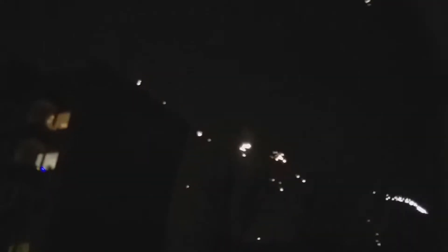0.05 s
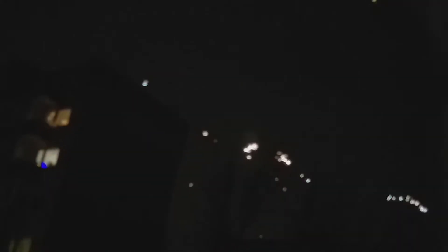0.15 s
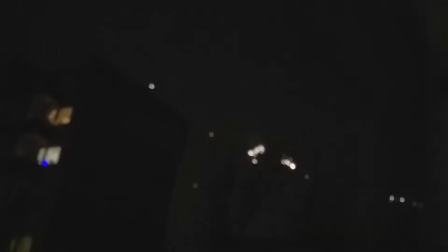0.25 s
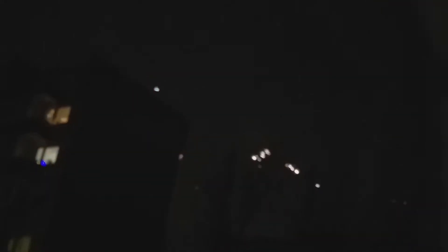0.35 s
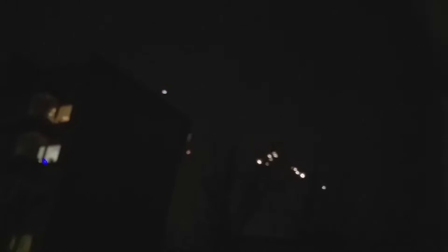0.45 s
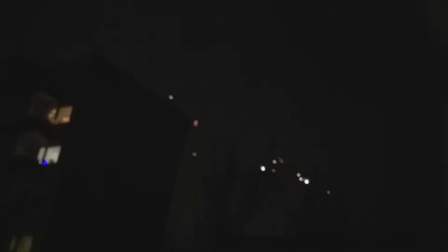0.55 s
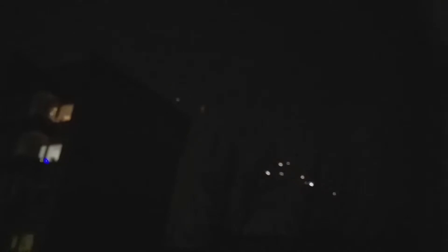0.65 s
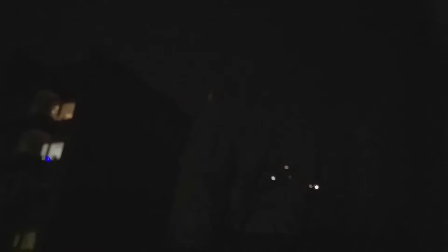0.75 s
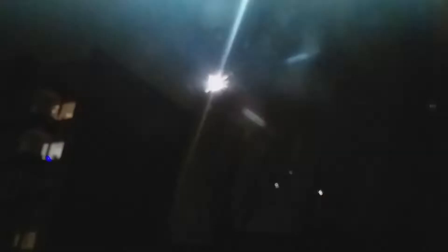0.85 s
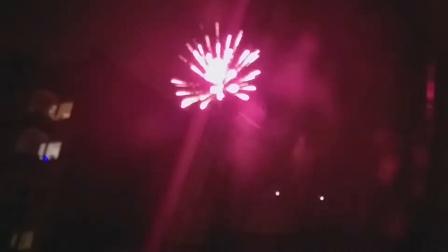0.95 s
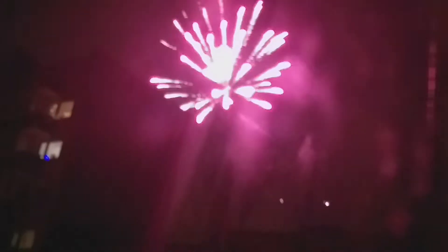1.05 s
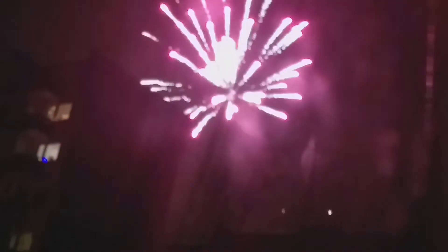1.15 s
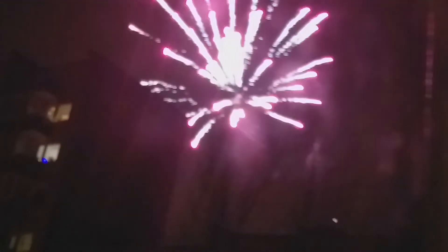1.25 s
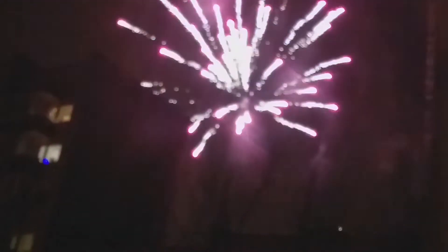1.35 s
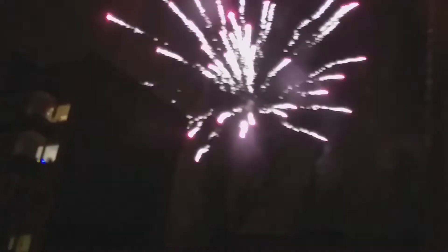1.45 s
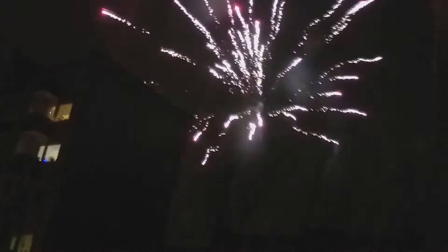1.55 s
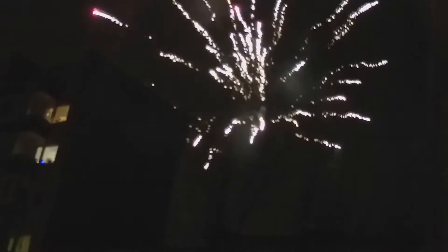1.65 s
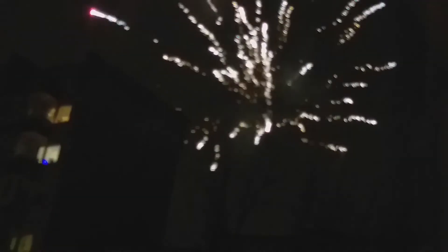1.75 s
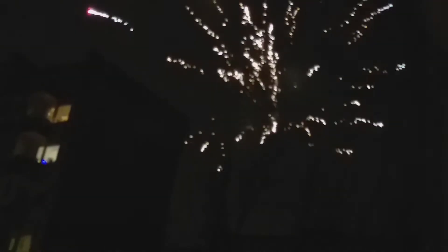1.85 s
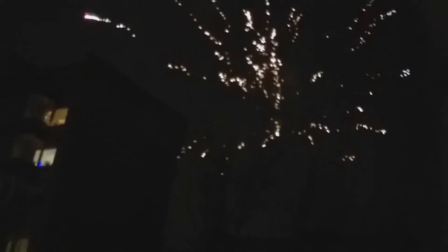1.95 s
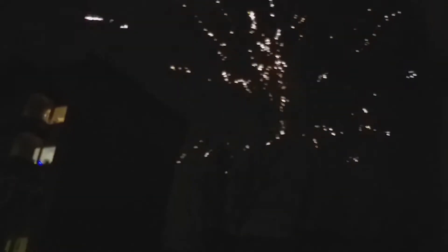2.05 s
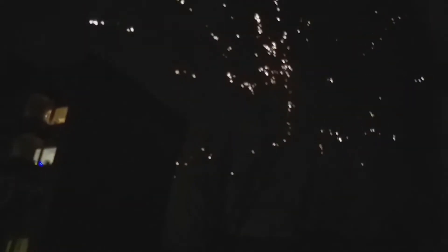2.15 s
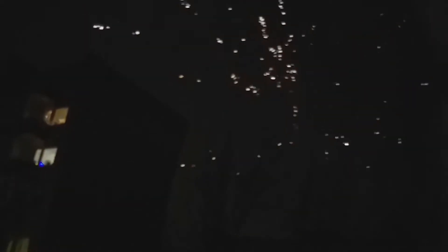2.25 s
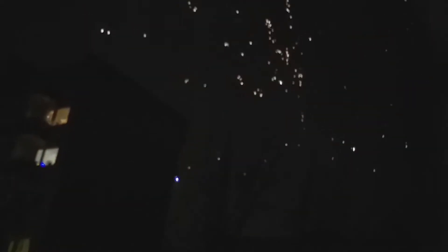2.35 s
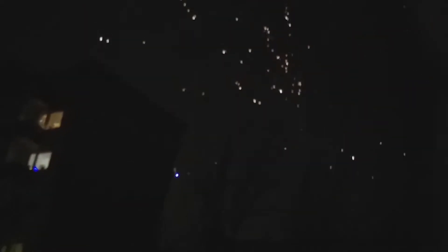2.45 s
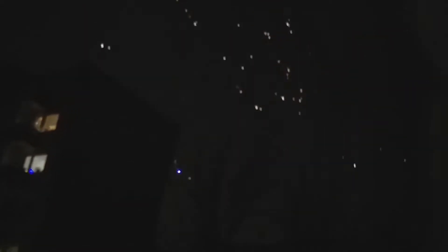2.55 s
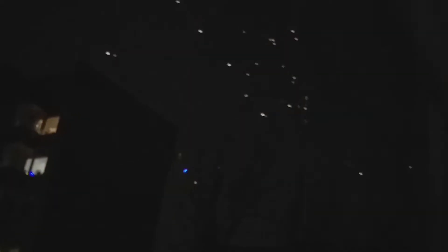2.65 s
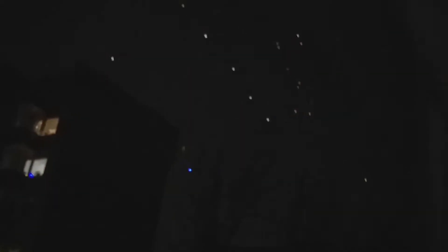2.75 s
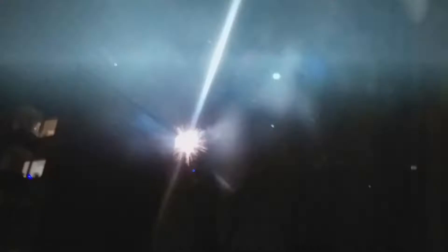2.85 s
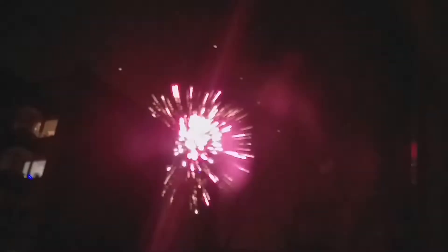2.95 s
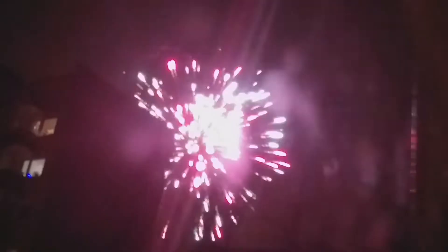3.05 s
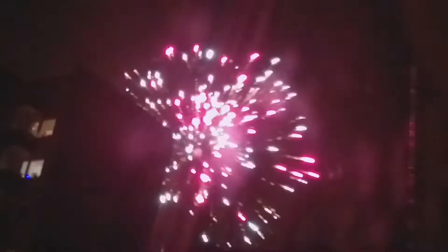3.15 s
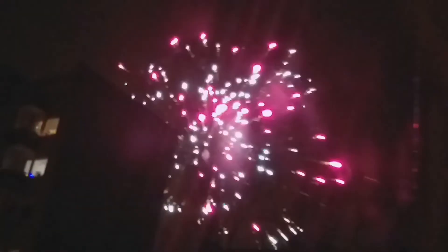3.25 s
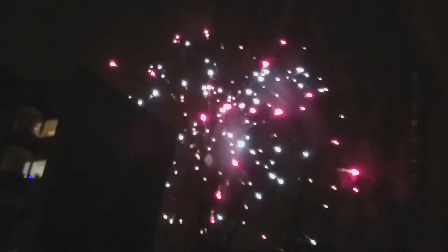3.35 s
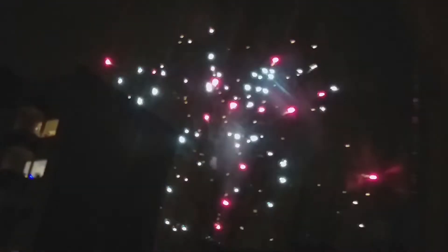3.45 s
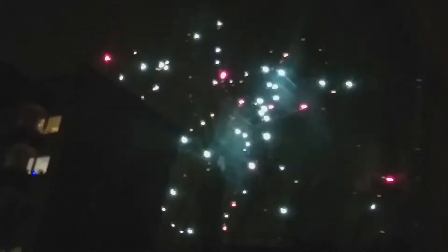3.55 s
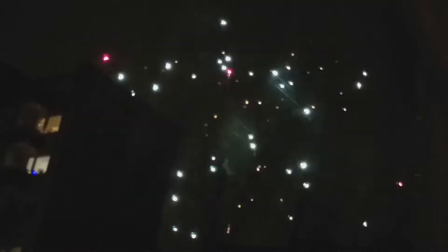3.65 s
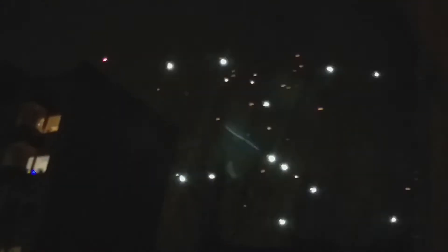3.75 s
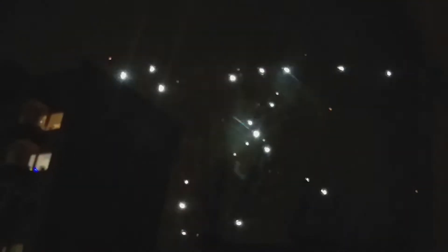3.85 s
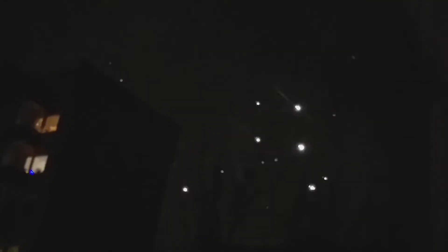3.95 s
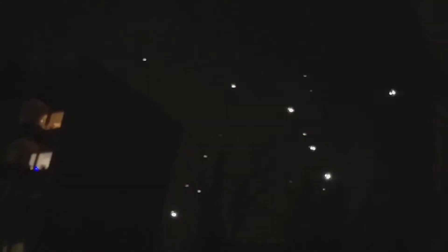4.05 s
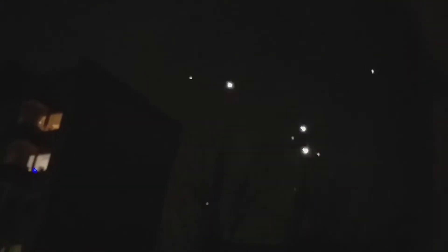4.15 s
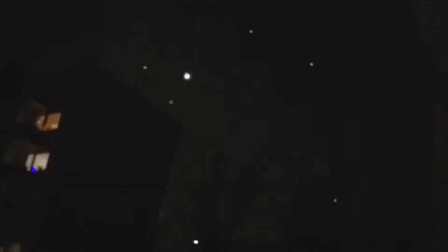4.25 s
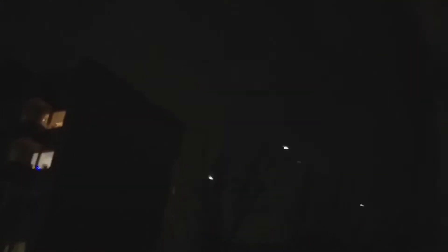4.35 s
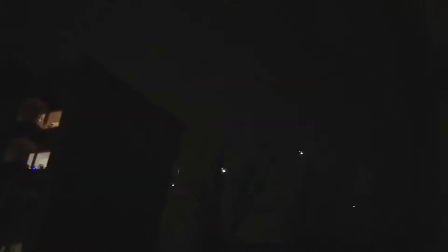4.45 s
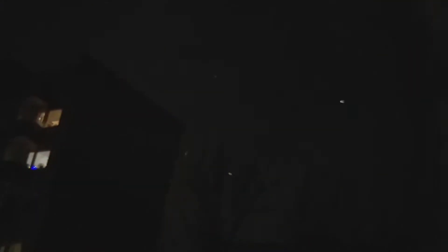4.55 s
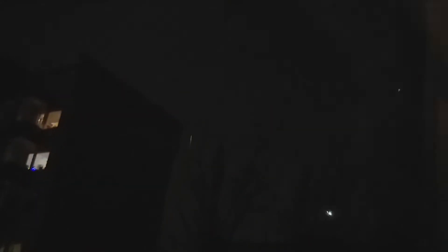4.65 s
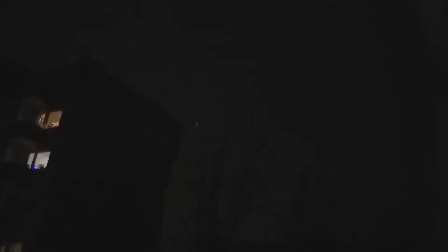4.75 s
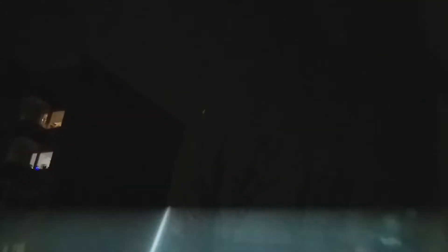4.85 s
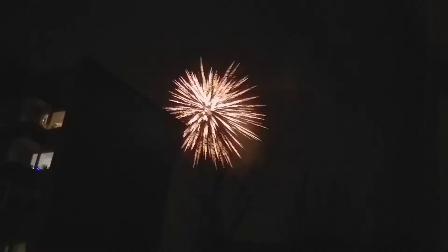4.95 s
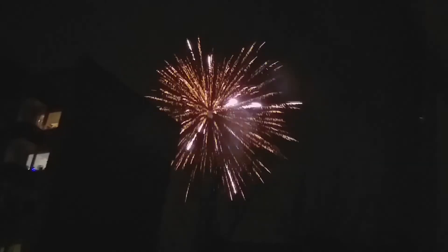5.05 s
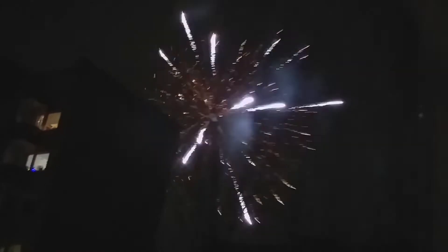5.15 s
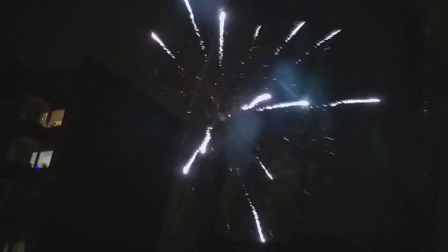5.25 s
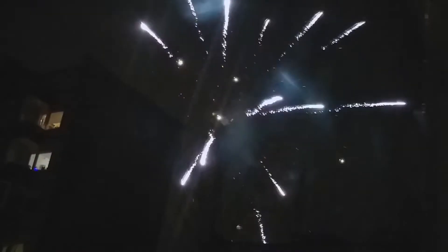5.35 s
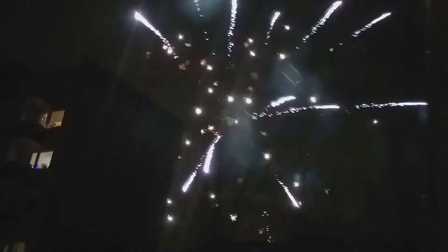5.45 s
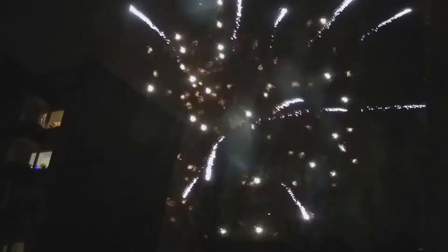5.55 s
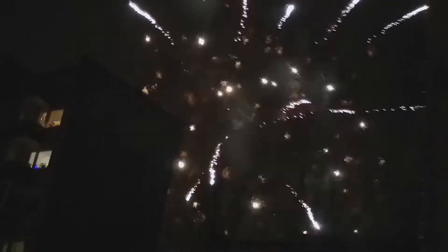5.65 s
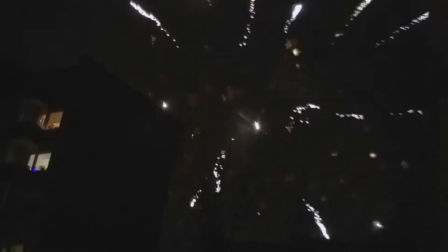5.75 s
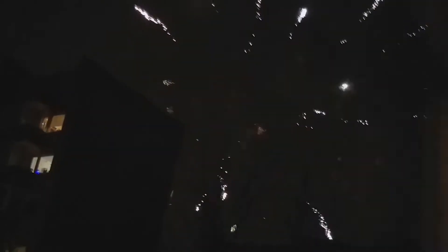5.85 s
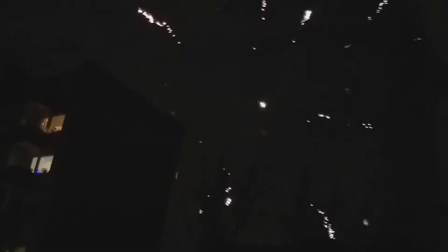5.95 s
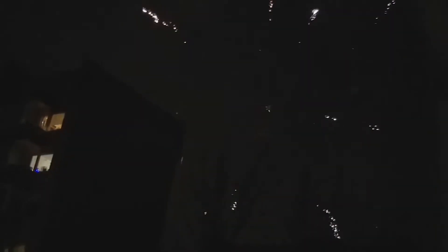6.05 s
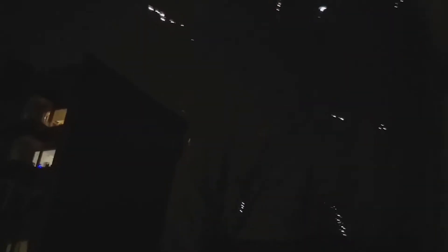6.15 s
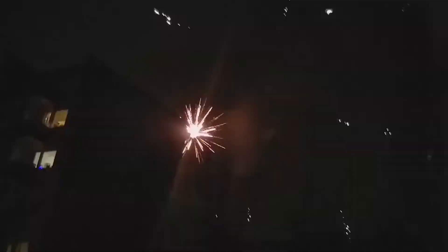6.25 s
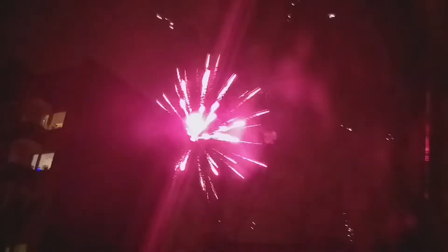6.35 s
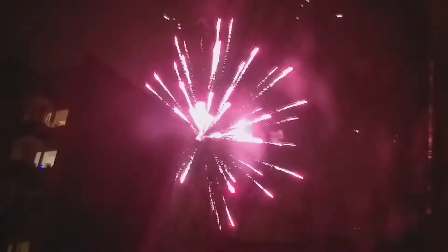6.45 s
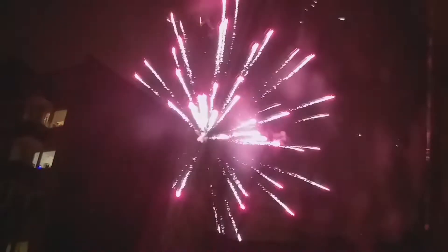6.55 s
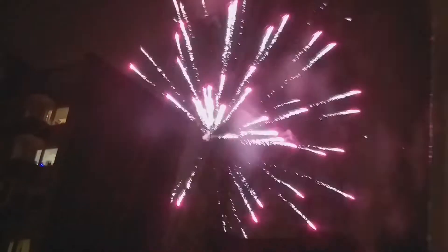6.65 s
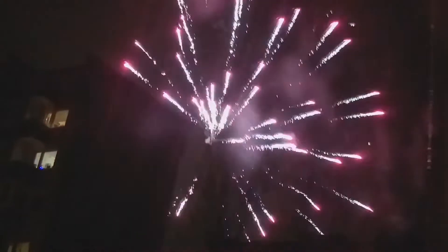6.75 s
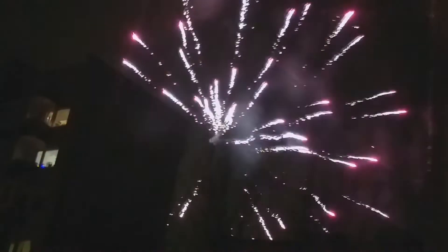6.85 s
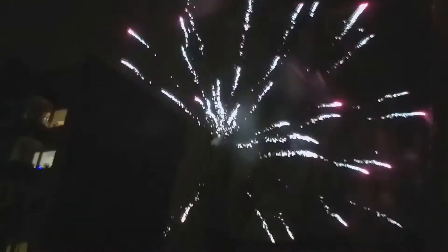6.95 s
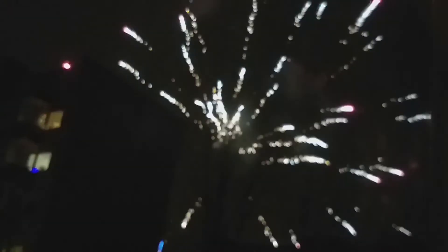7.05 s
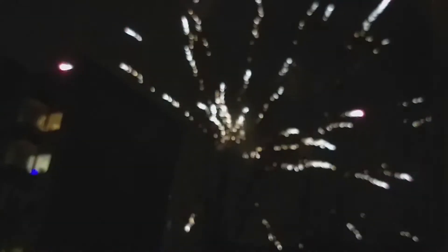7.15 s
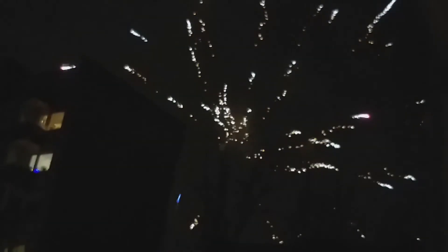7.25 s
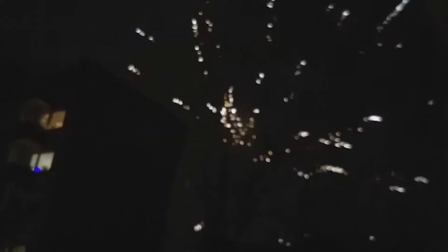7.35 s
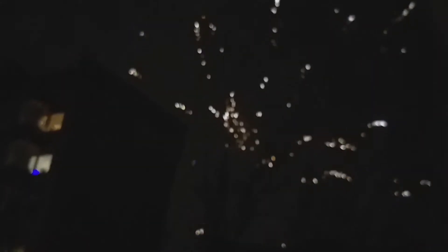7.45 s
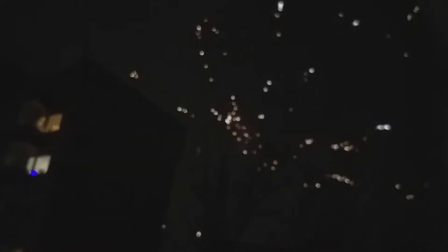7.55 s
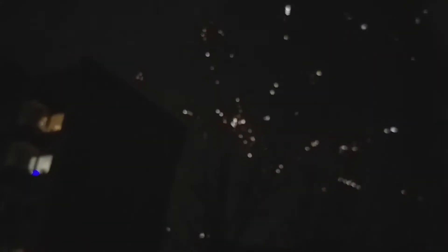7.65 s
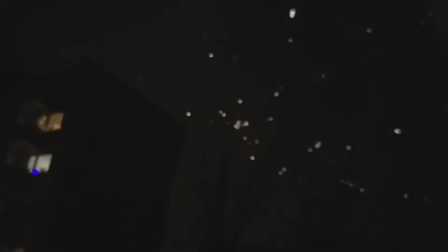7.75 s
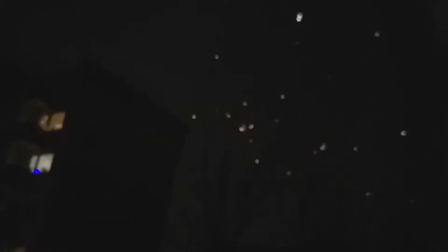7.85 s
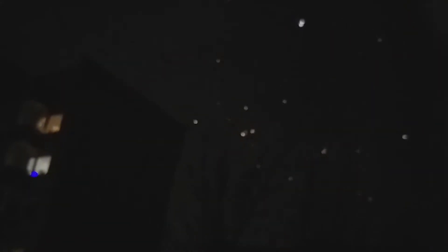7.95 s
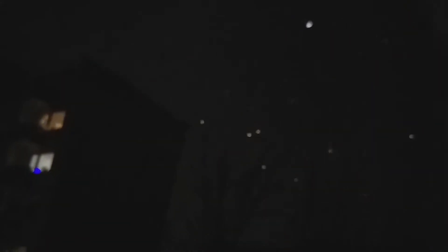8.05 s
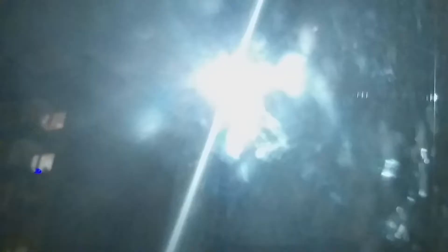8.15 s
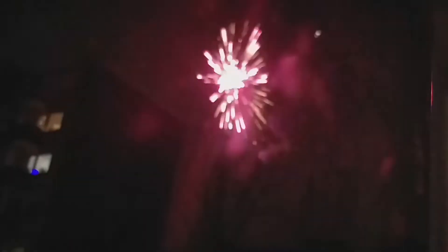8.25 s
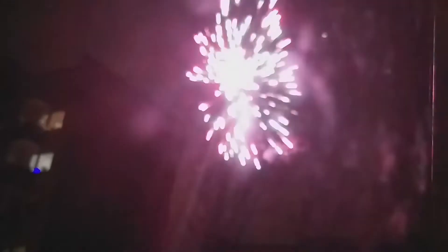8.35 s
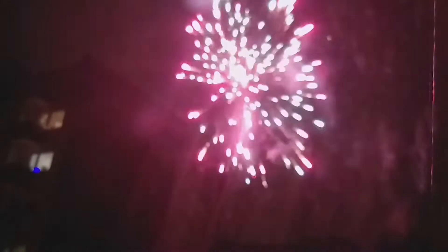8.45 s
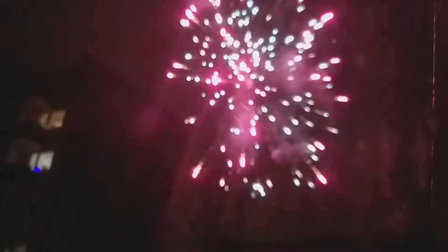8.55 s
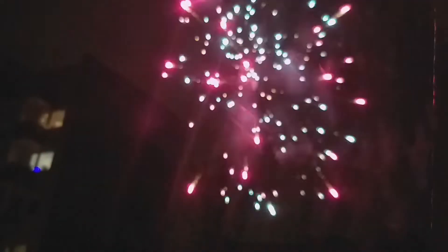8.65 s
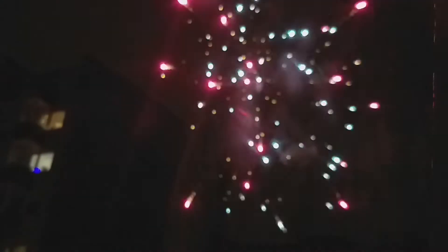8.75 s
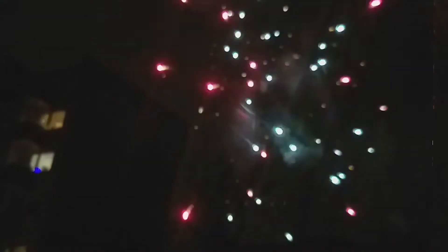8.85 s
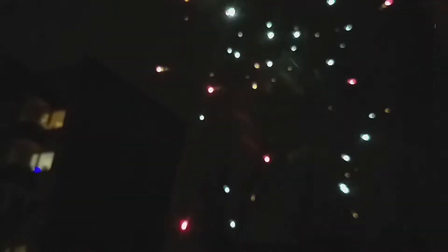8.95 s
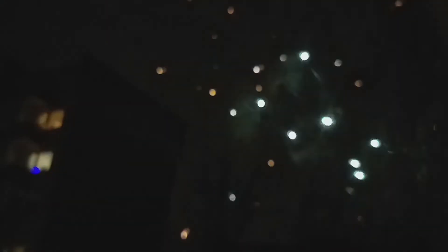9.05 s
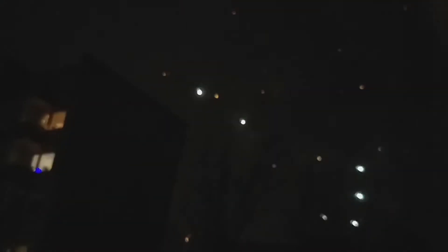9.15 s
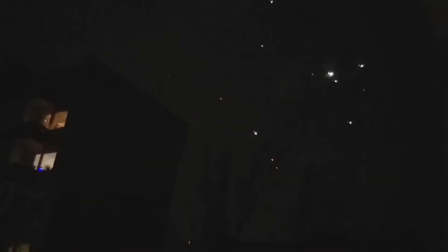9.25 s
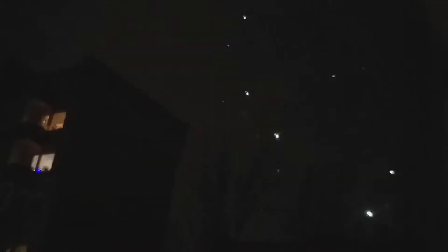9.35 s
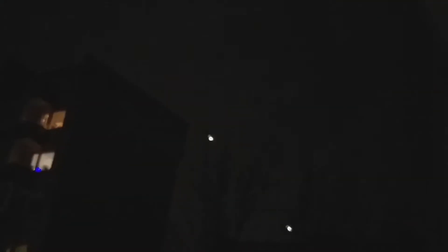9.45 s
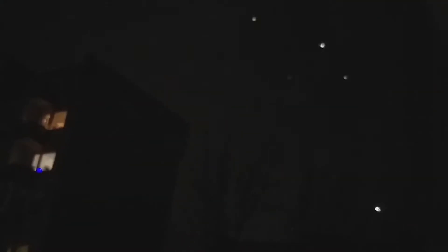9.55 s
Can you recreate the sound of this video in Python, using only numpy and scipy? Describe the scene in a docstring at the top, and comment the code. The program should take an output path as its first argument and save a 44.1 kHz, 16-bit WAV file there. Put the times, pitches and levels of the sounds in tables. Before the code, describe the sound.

A string of dull firework thuds from behind glass, each slapping back off house fronts and rumbling away, with one brief faint crackle.

```python
"""Fireworks through a shut window

A street at night, the microphone indoors behind the glass. Mortars thump at street level and shells burst
overhead, one into a cloud of crackling stars. The pane turns each blast into a low thud and leaks treble
near 3 kHz; close walls repeat it and the room rings. House fronts slap back, and echoes roll in from
distant buildings over the murmur of the town."""
import sys
import numpy as np
from scipy import signal
from scipy.io import wavfile
from scipy.ndimage import uniform_filter1d

SR = 44100
rng = np.random.default_rng(int(sys.argv[2]) if len(sys.argv) > 2 else 0)


def digitize_waveform(pressure):
    """Quantize a signal to 16-bit integers and store it at the path in sys.argv[1].

    Rows of a 2-D input are taken as channels; values are limited to [-1, 1].
    """
    field = np.atleast_2d(pressure).T
    bounded = np.clip(field, -1, 1)
    quanta = np.round(bounded * 32767).astype(np.int16)
    wavfile.write(sys.argv[1], SR, quanta)


N = 422919

# Shells overhead. Each row: start in seconds; thud, boom, crack, its tail against it and sizzle in dB;
# pane clack in Hz and in dB; street roll in dB; its treble hold in seconds; far answer in dB.
SHELLS = [(1.07, -7, -21.5, -40, 3.5, -57, 1820, -41, 0.4, 0.81, -6.5),
          (3.0652, -8, -22, -31, -5.5, -54.5, 4260, -33.5, 0.5, 0.46, 2.5),
          (5.1082, -4.3, -21, -23, -9, -50, 1630, -35.5, 0.6, 0.78, 1.5),
          (6.4347, -6, -22, -33, -4.5, -72, 4090, -46, 0.2, 0.43, 5.5),
          (8.3869, -2.5, -22.3, -25.5, -6, -47.5, 4000, -30.5, -2.5, 1.04, -4.5)]
# Mortars at street level. Each row: start in seconds; thump, boom, crack and pane ring in dB;
# delay of the far knock in seconds; echo strength in dB.
MORTARS = [(0.6384, -17, -37, -54.5, -52.5, 0.26, 1), (4.0564, -13, -42.5, -43.5, -45, 0.29, 1),
           (7.3049, -14.5, -32.5, -54, -49.5, .290, 2), (8.9042, -15, -34, -44, -48, .259, -3.5)]
# Walls close to the window. Each row: delay in milliseconds, level in dB.
NEAR_WALLS = [(4.2, -4), (7.0, 2.5), (10, -8), (13.8, -4), (17.5, -3), (20.4, -9), (26.3, -9), (30.0, -7.5),
              (36.3, -10), (42.5, -10.5)]
# Slaps from outside. Each row: delay after the blast in seconds, then thud, snap and pane ring in dB.
SHELL_SLAPS = [(.162, -29.5, -48, -54), (.352, -27, -47.5, -52.5), (.414, -28, -55, -52)]
MORTAR_SLAPS = [(.066, -27, -57, -59.5), (.089, -24, -55, -48.5), (.112, -25, -62, -53.5),
                (.242, -29.5, -65, -60.5), (.254, -31, -67, -54), (0.343, -30, -63, -59),
                (.422, -30, -63, -66.5)]
# Single stars and stray slaps. Each row: start in seconds, then thud, snap and pane ring in dB.
STRAY_POPS = [(0.147, -30.5, -55.5, -58), (1.117, -21, -37.5, -47.5), (1.57, -32, -58, -65),
              (1.65, -23, -47, -46.5), (1.741, -31.5, -55, -49), (1.905, -23, -61, -56),
              (2.0, -25.5, -61, -60), (2.123, -29, -71, -76), (3.288, -24.5, -43, -55),
              (3.478, -31, -52, -48.5), (3.981, -29, -63, -63), (5.374, -25, -46.5, -48),
              (5.62, -26.5, -48, -49), (5.787, -25.5, -47.5, -43), (6.923, -27, -50, -66),
              (7.727, -28, -55.5, -61), (8.03, -36, -62.5, -75)]
# Resonances of the glass and the room. Each row: frequency in Hz, width in Hz, level in dB.
GLASS_MODES = [(1220, 12, -13), (1384, 38, -1), (1710, 13, -1), (1840, 14, 0.5), (2772, 45, 1),
               (3870, 7.2, 4.5), (4220, 12, -1.5)]
STANDING_WAVES = [(132.3, 6.9, -7.5), (160.9, 3.4, 6.5), (216.6, 7.7, -1), (237.1, 3, -1), (310.3, 17, -3),
                  (380.2, 7.5, -0.5), (435.6, 11, -9.5), (500, 8.5, 1.5), (620, 1.5, 1.5), (715, 5, -9),
                  (1012, 8, -3)]
# The room's tail. Each row: frequency in Hz, seconds to fall by 60 dB.
ROOM_DECAY = [(100, 0.47), (300, 0.54), (1000, 0.35), (3000, 0.43), (8000, 0.38)]
# Spectra on the microphone's side of the glass. Each row: frequency in Hz, relative level in dB.
SHELL_THUD = [(20, -60), (50, -39.5), (80, -23.5), (125, -9.5), (200, -4.5), (290, -1.5), (430, -9),
              (560, -17.5), (720, -41.5), (1000, -29), (1400, -59), (3000, -71), (5500, -76), (16000, -92)]
STREET_THUMP = [(20, -43), (50, -34.5), (80, -22), (125, -11.5), (200, 2), (290, 5.5), (430, -8.5),
                (580, -21.5), (750, -29), (1000, -26.5), (1500, -49), (5500, -81.5)]
HOLLOW_BODY = [(200, -30), (380, -5), (450, 3), (540, -3), (680, -16.5), (1000, -19.5), (2000, -63.5)]
FACADE_BOOM = [(25, -51.5), (70, -27), (100, -12.5), (130, -3.5), (160, 2), (185, -3), (230, -1),
               (300, 3.5), (450, -8), (700, -23), (1000, -26), (1500, -37), (4000, -69.5)]
BLAST_CRACK = [(300, -14), (650, 5.5), (1000, 8), (1400, -2.5), (2300, -1.5), (2900, 2), (4300, -5),
               (5200, -16), (6300, -30.5), (8200, -37), (10000, -55.5), (16000, -61)]
TOP_SIZZLE = [(3000, -20.5), (4500, 4.5), (5500, 1), (6500, -1.5), (8200, 1), (9300, -13.5), (10300, -27.5),
              (16000, -41.5)]
GLASS_LEAK = [(600, -10.5), (1100, -9), (1600, -14), (2400, -7), (2650, 2.5), (2850, 8.5), (3200, 3.5),
              (3700, -17), (4400, -37), (6000, -42.5), (10000, -51)]
STAR_CRACKLE = [(400, -5), (1000, 5), (1600, -4), (2300, -3), (2900, 5), (4200, -2.5), (5200, -23),
                (6500, -37.5), (11000, -46.5)]
SLAP_SNAP = [(300, -11.5), (650, 4.5), (1000, 8.5), (1400, -5.5), (2300, -5.5), (2900, -4), (3700, -3.5),
             (4400, -24.5), (5600, -24), (7000, -39.5), (12000, -50.5)]
ROLL_RUMBLE = [(25, -59.5), (70, -34.5), (115, -14.5), (150, -7.5), (185, -7.5), (225, -0.5), (320, -6),
               (480, -15.5), (680, -27), (1000, -35), (1500, -55), (5000, -86.5)]
ROLL_MIDRANGE = [(300, -22.5), (550, 0), (750, 13.5), (1050, 5), (1400, -11), (2300, -10), (4000, -45.5),
                 (8000, -67)]
TOWN_MURMUR = [(25, -11), (70, -3), (160, 12), (300, 7), (600, -15), (1200, -22.5), (3000, -20.5),
               (6000, -25.5), (15000, -27.5)]

# Waves of merged echoes. Each row: delay and build-up in seconds, rumble in dB, its fade in dB/s,
# treble in dB, its steady sag in dB/s, its extra fade after the hold in dB/s.
STREET_ROLL = (0.0762, 0.15, -29, 9.5, -54.5, 5, 35.5)  # the surrounding streets
FAR_BLOCK_ROLL = (0.67, 0.53, -25.3, 34, -54.5, 10, 42)  # a large block further off
NEAR_HOUSES_ROLL = (0.24, 0.22, -22, 55, -54, 40, 88.5)
STREET_END_ROLL = (0, 0.63, -31, 25, -57, 21.5, 15)

FAR_KNOCK_DB = (-31, -60, -48)  # slap from the end of the street: thud, snap, pane ring
FACADE_DELAY_S = 0.052  # house fronts across the street
FAR_BLOCK_DELAY_S, FAR_BLOCK_DB = 0.351, -19  # the level adds to each shell's far answer
BODY_DB, SLAP_SCATTER_DB = -21.5, -9  # each against its thud
MID_TREBLE_SHARE, MID_DB = 0.56, -5.5  # the air takes the midrange at a pace between rumble and treble
CRACKLE_START_S, CRACKLE_PEAK_S, CRACKLE_END_S, CRACKLE_EDGE_S = 5.55, 5.816, 5.96, 0.039
CRACKLE_DB, CRACKLE_SWELL_DB_PER_S, CRACKLE_THIN_DB_PER_S = -51, 23, 46
NIGHT_DB = -60.5
LOWPASS_HZ = 15750


def shell_bursts():
    """Each blast arrives from overhead, then off close walls, the fronts opposite and a far block."""
    out = np.zeros(N)
    for s, thud_db, boom_db, crack_db, tail_db, sizzle_db, clack_hz, clack_db, *_, far_db in SHELLS:
        thud = gain_of(thud_db) * wall_thud()
        add(out, s, thud)
        add(out, s + FAR_BLOCK_DELAY_S, gain_of(far_db + FAR_BLOCK_DB) * thud)
        add(out, s, gain_of(thud_db + BODY_DB) * crack(HOLLOW_BODY, peak_s=0.013, tail_db=-4.5))
        add(out, s + FACADE_DELAY_S, gain_of(boom_db) * room_tail(FACADE_BOOM, rise_s=0.0033))
        add(out, s, gain_of(crack_db) * crack(BLAST_CRACK, peak_s=0.0053, tail_db=tail_db))
        add(out, s, gain_of(sizzle_db) * crack(TOP_SIZZLE, peak_s=0.0017, tail_db=-6))
        # the band that the pane favours depends on the angle at which the blast meets it
        band = [(clack_hz / 2, -50), (clack_hz / 1.15, -10), (clack_hz, 0),
                (clack_hz * 1.15, -10), (clack_hz * 1.6, -60)]
        add(out, s, gain_of(clack_db) * crack(band, peak_s=0.0033, tail_db=-16.5))
    return out


def wall_thud():
    """A thud from above, followed by its reflections off the walls near the window."""
    out, thud = np.zeros(SR // 4), pulse(SHELL_THUD)
    add(out, 0, thud)
    for delay_ms, wall_db in NEAR_WALLS:
        path_ms = delay_ms + rng.uniform(-0.23, 0.15)  # each shell sits elsewhere in the sky
        add(out, path_ms / 1000, gain_of(wall_db) * thud)
    return out


def crack(colour, peak_s, tail_db):
    """One band of a blast: a short rush of arrivals through the pane, then the room's tail."""
    size = SR // 2
    age = np.arange(size) / SR / peak_s
    rush = tinted(rng.standard_normal(size), colour) * age * np.exp(1 - age)
    return rush + gain_of(tail_db) * room_tail(colour, rise_s=0.0024, size=size)


def mortar_shots():
    """Down in the street, a mortar's short thump misses the close walls; the fronts opposite answer."""
    out, thump = np.zeros(N), pulse(STREET_THUMP)
    for s, thump_db, boom_db, crack_db, pane_db, *_ in MORTARS:
        add(out, s, gain_of(thump_db) * thump)
        add(out, s, gain_of(thump_db + BODY_DB) * crack(HOLLOW_BODY, peak_s=0.012, tail_db=-10.5))
        add(out, s + FACADE_DELAY_S, gain_of(boom_db) * room_tail(FACADE_BOOM, rise_s=0.014))
        add(out, s, gain_of(crack_db) * crack(BLAST_CRACK, peak_s=0.0025, tail_db=-7))
        add(out, s, gain_of(pane_db) * crack(GLASS_LEAK, peak_s=0.0092, tail_db=-15))
    return out


def crackling_stars():
    """High above the street, tiny stars pop in a cloud that swells, thins and burns out."""
    pops = patter(per_s=140, spread_db=2.5, smear_s=0.014, smear_db=7)
    t = np.arange(N) / SR
    inside_s = np.minimum(t - CRACKLE_START_S, CRACKLE_END_S + CRACKLE_EDGE_S - t)
    burning = np.clip(inside_s / CRACKLE_EDGE_S, 0, 1)
    past_peak_s = t - CRACKLE_PEAK_S
    below_peak_db = np.maximum(-CRACKLE_SWELL_DB_PER_S * past_peak_s, CRACKLE_THIN_DB_PER_S * past_peak_s)
    return steadied(tinted(pops, STAR_CRACKLE)) * burning * gain_of(CRACKLE_DB - below_peak_db)


def slaps():
    """Distant reflections and pops: a thud scattered by balconies and ledges, a snap, a glassy ring."""
    out, thud = np.zeros(N), pulse(STREET_THUMP)
    for s, thud_db, snap_db, pane_db in STRAY_POPS + facade_echoes():
        add(out, s, gain_of(thud_db) * thud)
        add(out, s, gain_of(thud_db + SLAP_SCATTER_DB) * crack(FACADE_BOOM, peak_s=0.012, tail_db=-14))
        add(out, s, gain_of(snap_db) * crack(SLAP_SNAP, peak_s=0.0018, tail_db=-3))
        add(out, s, gain_of(pane_db) * crack(GLASS_LEAK, peak_s=0.006, tail_db=-26))
    return out


def facade_echoes():
    """House fronts return every burst and mortar shot; the rows read like those of STRAY_POPS."""
    blasts = [(s, far_db, SHELL_SLAPS) for s, *_, far_db in SHELLS]
    for s, *_, knock_s, echo_db in MORTARS:
        blasts.append((s, echo_db, MORTAR_SLAPS + [(knock_s, *FAR_KNOCK_DB)]))
    return [(s + delay_s, *(db + np.array(levels_db)))
            for s, db, fronts in blasts for delay_s, *levels_db in fronts]


def rolling_echoes():
    """Countless echoes from buildings near and far merge into a rumble with a grainy treble edge."""
    rumble_db, treble_db = roll_levels()
    middle_db = rumble_db + MID_TREBLE_SHARE * (treble_db - rumble_db) + MID_DB
    echoes = pane_and_room(patter(per_s=350, spread_db=1, smear_s=0.018, smear_db=3))
    layers = (ROLL_RUMBLE, rumble_db), (ROLL_MIDRANGE, middle_db), (GLASS_LEAK, treble_db)
    return sum(gain_of(db) * steadied(tinted(echoes, colour)) for colour, db in layers)


def roll_levels():
    """The echo waves of all blasts add in power, giving rumble and treble in dB over time."""
    power = echo_wave(STREET_ROLL, s=-0.69, db=-1.4, hold_s=0.72)  # an earlier shell still rolling away
    for s, *_, roll_db, hold_s, far_db in SHELLS:
        power += echo_wave(STREET_ROLL, s, roll_db, hold_s) + echo_wave(FAR_BLOCK_ROLL, s, far_db)
    for s, *_, echo_db in MORTARS:
        power += echo_wave(NEAR_HOUSES_ROLL, s, echo_db) + echo_wave(STREET_END_ROLL, s, echo_db)
    return 10 * np.log10(power + 1e-14)


def echo_wave(shape, s, db, hold_s=0.076):
    """Power returned by one group of buildings: the rumble fades evenly, the treble sags, then drops."""
    delay_s, rise_s, rumble_db, rumble_fade, treble_db, treble_sag, treble_fade = shape
    age = np.maximum(np.arange(N) / SR - s - delay_s, 0)
    rumble = rumble_db - rumble_fade * age
    treble = treble_db - treble_sag * age - treble_fade * np.maximum(age - hold_s, 0)
    build_up = np.minimum(age / rise_s, 1)
    return (build_up * gain_of(db) * gain_of([rumble, treble])) ** 2


def pane_and_room(x):
    """Sound from outside rings the pane and the standing waves around the microphone."""
    t = np.arange(SR) / SR
    ring = np.zeros(SR)
    for hz, width_hz, db in GLASS_MODES + STANDING_WAVES:
        decay = 2 * np.pi * width_hz / SR * np.exp(-np.pi * width_hz * t)
        ring += gain_of(db) * decay * np.cos(2 * np.pi * hz * t)
    return x + signal.fftconvolve(x, ring)[:N]


def room_tail(colour, rise_s, size=SR):
    """Scattered room sound builds up, then each band dies at its own speed."""
    hz, t, bands = signal.stft(tinted(rng.standard_normal(size), colour), SR, nperseg=512)
    decay = gain_of(-60 * t / value_at(ROOM_DECAY, hz)[:, None])
    tail = signal.istft(bands * decay, SR, nperseg=512)[1][:size]
    return tail * (1 - np.exp(-np.arange(size) / SR / rise_s))


def night_town():
    """The low murmur of the town beyond the street, with a faint hiss."""
    return gain_of(NIGHT_DB) * tinted(rng.standard_normal(N), TOWN_MURMUR)


def patter(per_s, spread_db, smear_s, smear_db):
    """Random arrivals of uneven size, each smeared by scattering; steady on average."""
    arrivals = rng.random(N) < per_s / SR
    clicks = arrivals * rng.choice([-1, 1], N) * gain_of(spread_db * rng.standard_normal(N))
    step = 1 / (smear_s * SR)
    power = signal.lfilter([step], [1, -np.exp(-step)], clicks ** 2)
    return clicks + gain_of(smear_db) * np.sqrt(power) * rng.standard_normal(N)


def pulse(colour, size=8192):
    """The minimum-phase pulse that has this spectrum, with a peak of 1."""
    log_gain = value_at(colour, abs(np.fft.fftfreq(size, 1 / SR))) * np.log(10) / 20
    spectrum = np.exp(np.conj(signal.hilbert(log_gain)))
    wave = np.fft.ifft(spectrum).real[:size // 2]
    return wave / abs(wave).max()


def tinted(x, colour):
    """x filtered by this spectrum, with an rms of 1."""
    filtered = signal.fftconvolve(x, pulse(colour))[:len(x)]
    return filtered / np.sqrt(np.mean(filtered ** 2) + 1e-20)


def steadied(x, size=3500):
    """x with its slow swells taken out, rms 1."""
    return x / np.sqrt(abs(uniform_filter1d(x ** 2, size)) + 1e-9)


def value_at(points, hz):
    """Interpolate a table on a log-frequency axis."""
    table_hz, values = np.transpose(points)
    return np.interp(np.log(hz + 1), np.log(table_hz + 1), values)


def gain_of(db):
    return 10 ** (np.asarray(db) / 20)


def add(mix, s, sound):
    part = mix[max(round(s * SR), 0):][:len(sound)]
    part += sound[:len(part)]


def scene():
    """The street as it reaches one microphone in the room behind the shut window."""
    indoors = pane_and_room(shell_bursts() + mortar_shots() + slaps() + night_town())
    return (indoors + rolling_echoes() + crackling_stars())[None]


def record(dry):
    """The recorder rounds off the loudest peaks at full scale and cuts the highest treble."""
    rounded = dry / (1 + dry ** 8) ** (1 / 8)
    lowpass = signal.firwin(511, LOWPASS_HZ, window=("kaiser", 9), fs=SR)
    return signal.oaconvolve(rounded, lowpass[None], "same")


dry = scene()
out = record(dry)
digitize_waveform(out)
```